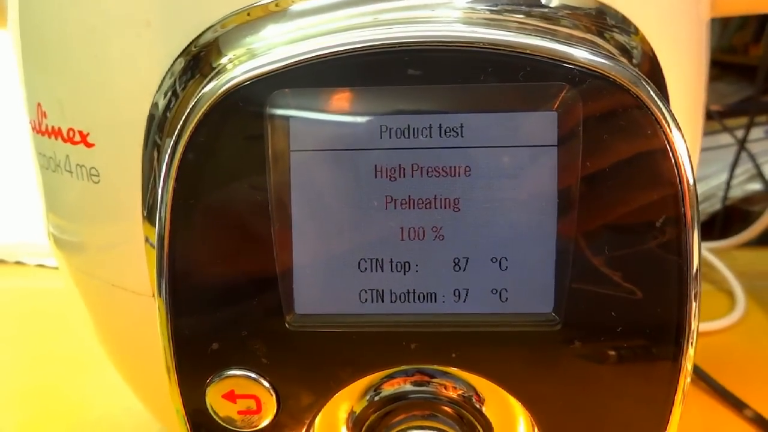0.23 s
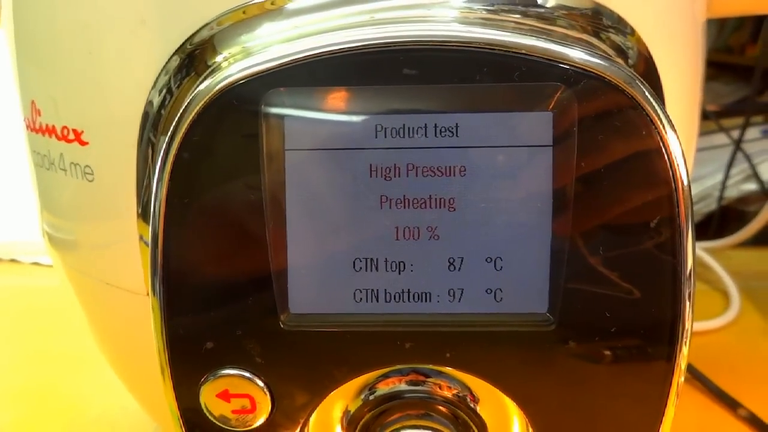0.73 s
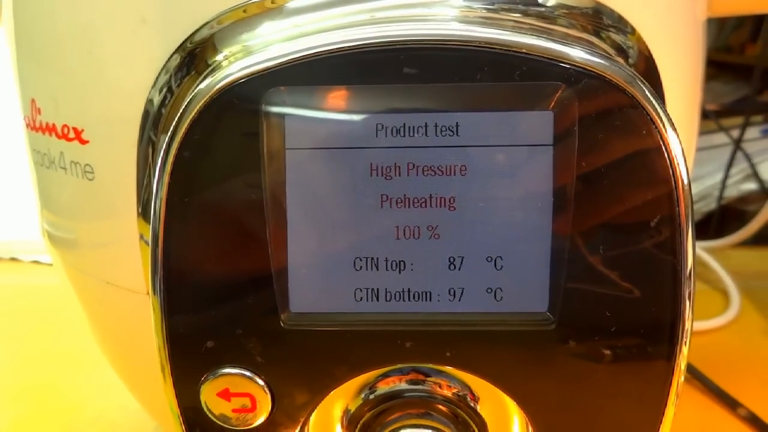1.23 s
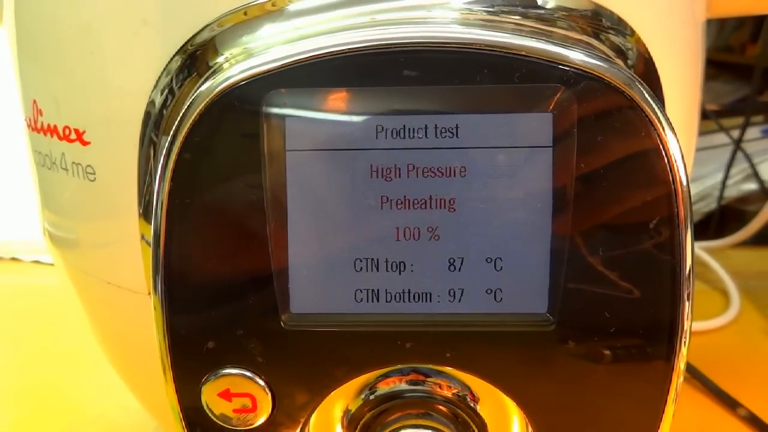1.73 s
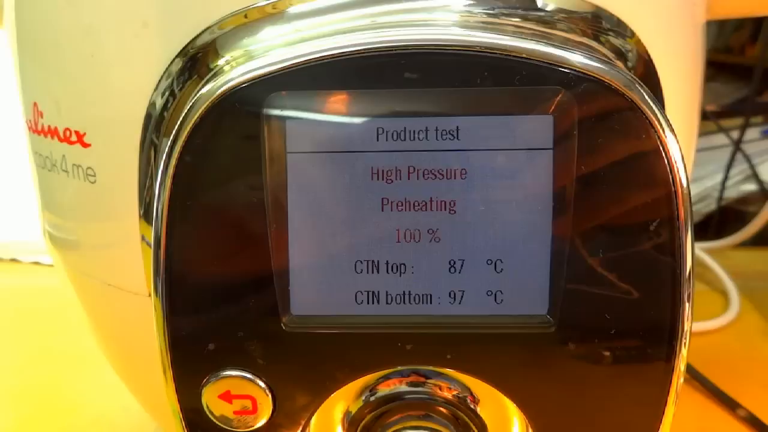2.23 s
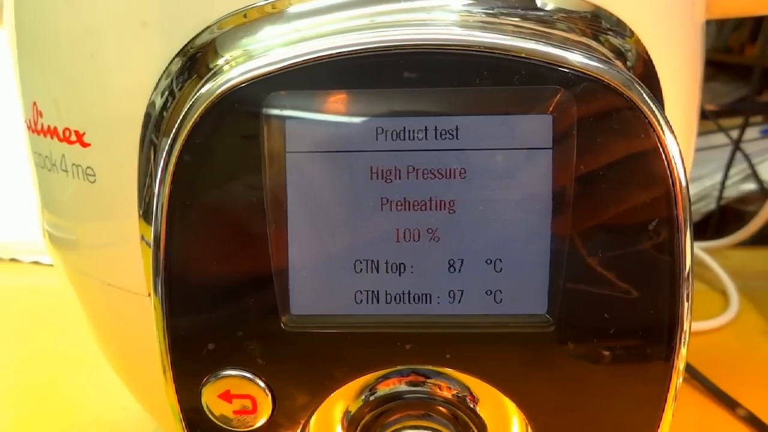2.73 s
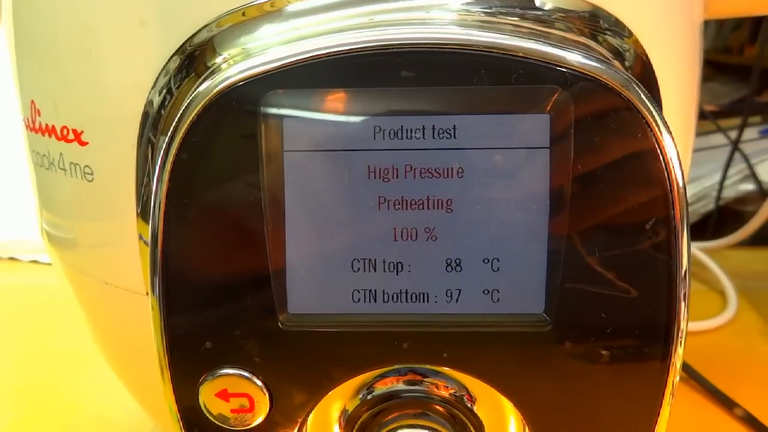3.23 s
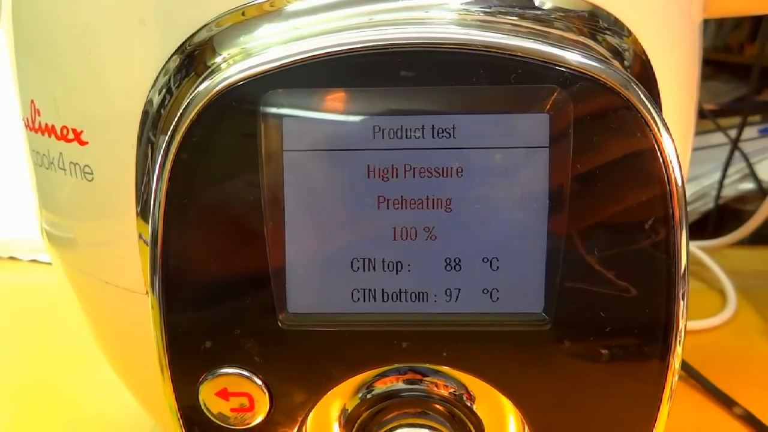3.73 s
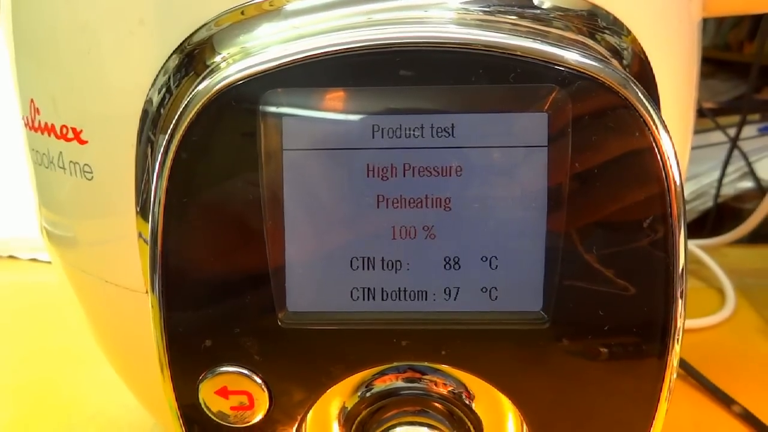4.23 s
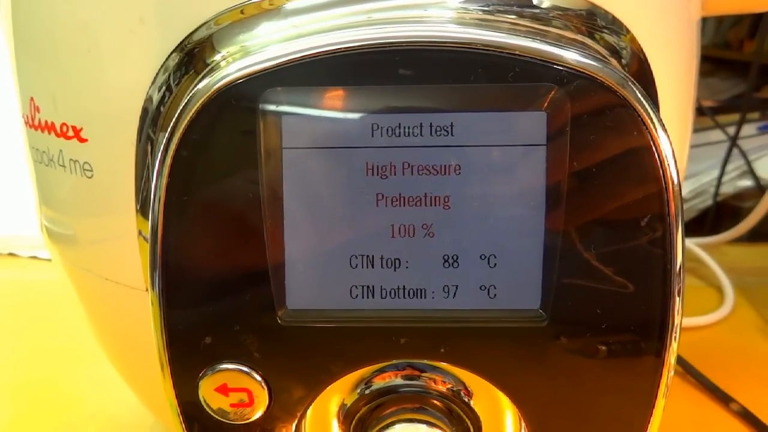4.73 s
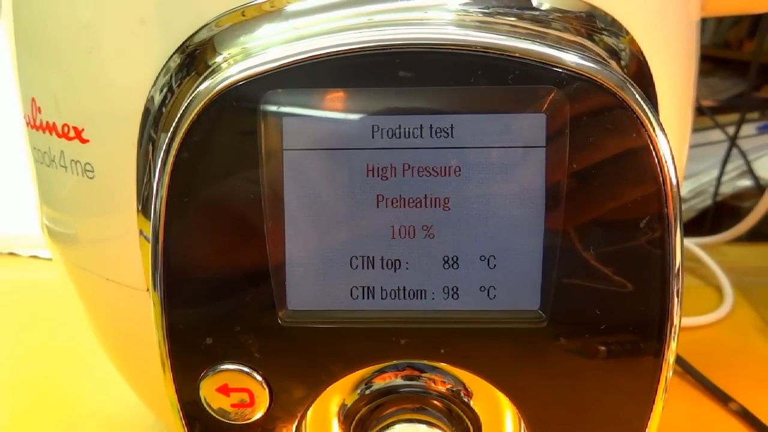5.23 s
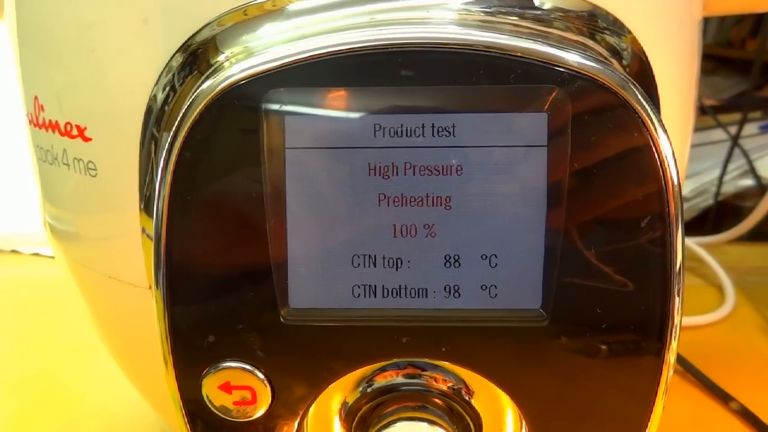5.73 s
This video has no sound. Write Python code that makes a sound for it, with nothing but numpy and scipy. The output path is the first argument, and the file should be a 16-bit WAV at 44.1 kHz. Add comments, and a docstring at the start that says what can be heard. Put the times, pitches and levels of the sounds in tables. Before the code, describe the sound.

A close, steady wet rush of steam with a hollow, ringing colour wavers gently and grows stronger over six seconds indoors.

```python
"""Steam from an electric pressure cooker

An electric pressure cooker comes up to pressure in a room, close to the microphones.
Wet turbulence sputters through the valve and rings the lid cavities; a jet at the gap hisses above it.
Condensate drops give short puffs, and once a faint pitch swells and fades as it rises.
Early echoes comb the treble, filtered noise rumbles as boiling water, and a decaying noise tail is the room.
"""
import sys
import numpy as np
from scipy import signal
from scipy.fft import rfft, irfft
from scipy.io import wavfile

SR = 44100
rng = np.random.default_rng(int(sys.argv[2]) if len(sys.argv) > 2 else 0)


def store_wav(level_fs):
    """Save 16-bit WAV to argv[1]."""
    pcm = np.round(np.clip(np.atleast_2d(level_fs), -1, 1) * 32767)
    wavfile.write(sys.argv[1], SR, pcm.T.astype(np.int16))


N = 264466
TIME = np.arange(N) / SR  # s
FREQ = np.maximum(np.arange(N // 2 + 1) * SR / N, 1)  # Hz, kept above 0 for the logarithms
OPPOSED = np.array([[1], [-1]])  # signs of a side signal at the left and right microphones


def undb(db):
    """Amplitude ratio: 20 dB is a factor of ten."""
    return 10 ** (np.asarray(db) / 20)


def unit(x):
    """Normalization to an rms of 1."""
    return x / np.sqrt(np.mean(x ** 2))


def shape(x, response):
    """Linear filtering: the spectrum is multiplied by a frequency response."""
    return irfft(rfft(x) * response, N)


def along(points):
    """Interpolation of (frequency [Hz], value) points on a logarithmic frequency axis."""
    hz, value = np.transpose(points)
    return np.interp(np.log(FREQ), np.log(hz), value)


def colour(points):
    """Spectral envelope: gain through (frequency [Hz], level [dB]) points."""
    return undb(along(points))


def below(hz):
    """Power-complementary crossover: the share of the power under a steep edge."""
    return 1 / (1 + (FREQ / hz) ** 20)


def causal(gain):
    """Minimum phase: folding the cepstrum makes a resonance ring only after it is struck."""
    cepstrum = irfft(np.log(gain + 1e-9), N)
    fold = 1 + np.sign(N / 2 - np.arange(N)) * (TIME > 0)
    return np.exp(rfft(cepstrum * fold))


def walk(rate_hz):
    """Low-pass noise: a random wander of rms 1 with little motion above the given rate."""
    return unit(shape(rng.standard_normal(N), 1 / (1 + (FREQ / rate_hz) ** 4)))


def lid():
    """Modal superposition: the powers of steep-sided cavity resonances add to a broad colour."""
    # resonances of the lid cavities: (frequency [Hz], full width at -6 dB [Hz], relative level [dB])
    lid_modes = [(593.6, 35, -17.5), (659.7, 89, -13), (801, 91, -11.5), (855, 78, -9.5), (968, 55, -8.5),
                 (1045, 140, -15.5), (1237, 67, -8.5), (1392.5, 60, -3.5), (1447, 100, -8), (1559, 84, 0.5),
                 (1646, 80, -2), (1813, 115, -5), (2001, 67, -8), (2118, 92, -8), (2177, 46, -7.5),
                 (2349, 89, -10.5), (2413, 120, -15.5), (2525, 78, -15), (2618, 47, -12.5), (2770, 76, -17),
                 (2900, 84, -18.5), (3098, 104, -16), (3470, 116, -18), (3667, 135, -19.5), (3953, 85, -21),
                 (4370, 60, -26)]
    # resonances of the small valve housing: (frequency [Hz], full width at -6 dB [Hz], relative level [dB])
    valve_modes = [(5770, 180, -22), (6280, 59, -13), (6480, 50, -16.5), (6675, 120, -14.5),
                   (7080, 130, -22), (7490, 75, -11), (7692, 99, -10.5), (9190, 71, -22.5)]
    # broad colour of the steam between the resonances: (frequency [Hz], relative level [dB])
    steam_colour = [(150, -50), (490, -26.5), (540, -39), (1100, -27), (2300, -30), (3300, -24),
                    (4300, -21.5), (4700, -35), (5750, -26), (7100, -22), (8500, -23.5), (9300, -31.5),
                    (9650, -39.5), (11000, -42)]
    power = colour(steam_colour) ** 2
    for hz, width, db in [*lid_modes, *valve_modes]:
        detuning = 2 * (FREQ - hz) / width
        power = power + undb(db) ** 2 / (1 + detuning ** 2) ** 2
    return causal(np.sqrt(power))


def sputter(rate_hz=170, spread_db=2.0, length_s=0.0022):
    """Shot process: water films break at random, each a burst of decaying power; the mean is 1."""
    chance = rng.random(N)
    size = np.minimum(rng.exponential(size=N), 4)
    bursts = (chance < rate_hz / SR) * undb(spread_db * size) ** 2
    power = signal.lfilter([1], [1, -np.exp(-1 / (length_s * SR))], bursts)
    return power / power.mean()


def wet_flow(response, level_db, wet, flutter_db, flutter_hz):
    """Source and filter: turbulence, sputtering in its wet share of power, rings the lid."""
    envelope = np.sqrt(1 - wet + wet * sputter())
    flutter = undb(flutter_db * walk(flutter_hz))
    drive = rng.standard_normal(N) * envelope * flutter
    return unit(shape(drive, response)) * undb(level_db)


def jet(response, level_db, flutter_db=0.8, flutter_hz=35):
    """Jet noise: steady turbulence at the valve gap makes a smoother hiss."""
    drive = rng.standard_normal(N) * undb(flutter_db * walk(flutter_hz))
    return unit(shape(drive, response)) * undb(level_db)


def spits(response, gain_db=-6, decay_s=0.0069):
    """Transient excitation: each larger drop gives a decaying puff of noise to the same resonances."""
    # drops of condensate spat through the valve: (time [s], relative peak level [dB])
    drops = [(0.34, -23), (1.334, -40), (2.31, -27), (3.067, -25), (3.525, -28.5), (3.604, -29),
             (4.664, -25), (4.722, -24), (5.06, -25.5), (5.335, -25.5), (5.781, -25)]
    puffs = np.zeros(N)
    for start, db in drops:
        puffs += undb(db) * (TIME >= start) * np.exp(-np.abs(TIME - start) / decay_s)
    return undb(gain_db) * shape(rng.standard_normal(N) * puffs, unit(np.abs(response)))


def whistle(peak_s=5.28, swell_s=0.05, hz=890, rise_hz_per_s=150, level_db=-47, waver_hz=6):
    """Frequency modulation: the steam briefly catches a faint, wavering pitch that rises."""
    since = TIME - peak_s
    pitch = hz + rise_hz_per_s * since + waver_hz * walk(34)
    tone = unit(np.sin(2 * np.pi * np.cumsum(pitch) / SR))
    return tone * undb(level_db) * np.exp(-(since / swell_s) ** 2 / 2)


def surfaces(x, echo_db=-8, decay_s=0.012, above_hz=3300, count=60):
    """Comb filtering: small hard surfaces nearby throw back the short waves."""
    lag = rng.uniform(.002, .04, count)  # s
    size = rng.standard_normal(count)
    echoes = np.bincount((lag * SR).astype(int), size * np.exp(-lag / decay_s), N)
    share = undb(echo_db) * np.sqrt(1 - below(above_hz))
    reflected = rfft(echoes) / np.linalg.norm(echoes)
    return shape(x, (1 + share * reflected) / np.sqrt(1 + share ** 2))


def microphones(x, pan_db=-0.17):
    """Interaural phase and level: the direct sound leads, and is slightly louder, on the left."""
    # phase by which the left microphone leads: (frequency [Hz], phase [rad])
    left_lead = [(100, 0), (350, 1), (600, 0.7), (1500, 0.19), (4000, 0.36), (9000, 0.053)]
    halves = OPPOSED / 2
    return shape(x, np.exp(1j * halves * along(left_lead)) * undb(-pan_db * halves))


def room(x, t60_s=0.31, mid_db=-2, side_db=0):
    """Diffuse reverberation: decaying noise tails, one shared by the microphones and one opposed."""
    # spectrum of the room sound, before the mid and side gains: (frequency [Hz], relative level [dB])
    room_share = [(300, -5), (500, -10.5), (700, -12), (1500, -14.5), (3000, -13.5), (4200, -20.5),
                  (4800, -4.5), (6200, -15.5), (9000, -12)]
    tails = rng.standard_normal((2, N)) * undb(-60 * TIME / t60_s)
    response = rfft(tails) / np.linalg.norm(tails, axis=1, keepdims=True)
    mid, side = shape(x, colour(room_share) * response)
    return undb(mid_db) * mid + undb(side_db) * side * OPPOSED


def boil(level_db, side_db=-5, swell_db=1.5, swell_hz=6):
    """Transmission through a wall: boiling is heard as muffled, wide noise that slowly swells."""
    # water boiling behind the pot wall: (frequency [Hz], relative level [dB])
    boil_colour = [(60, -30), (130, -10), (175, 2), (240, -1.5), (330, -4), (480, 0), (800, -20),
                   (3000, -60)]
    mid, side = shape(rng.standard_normal((2, N)), colour(boil_colour))
    rumble = unit(mid + undb(side_db) * side * OPPOSED)
    return rumble * undb(level_db + swell_db * walk(swell_hz))


def room_air(air_db=-76.5, hum_hz=50, hum_db=-100, apart_hz=260):
    """Spatial coherence: background air is alike on both sides in the bass; a trace of mains hum is added."""
    # still air of the room: (frequency [Hz], relative level [dB])
    air_colour = [(20, -17), (50, -9), (90, -4), (130, 2.5), (175, -1), (400, 1), (600, -2), (2000, -16),
                  (10000, -27)]
    mid, side = shape(rng.standard_normal((2, N)), colour(air_colour))
    side = shape(side, FREQ / np.hypot(FREQ, apart_hz))
    hum = unit(np.sin(2 * np.pi * hum_hz * TIME))
    return undb(air_db) * unit(mid + side * OPPOSED) + undb(hum_db) * hum


def scene(burble_top_hz=1300, flow_top_hz=4900):
    """Common excitation: one steam flow drives burble, rush, jet and boiling, the steam split into bands."""
    # steam flow, which sags and surges as the pot heats: (time [s], level about the usual flow [dB])
    steam_flow = [(0.0, -0.5), (0.44, -1.4), (0.92, -6), (1.72, -2.0), (2.0, -2.0), (2.1, 0.5),
                  (2.52, 0.15), (3.02, 4.0), (4.24, -0.95), (4.32, 1), (4.38, 1.2), (4.9, 2.5), (5.1, -0.8),
                  (5.34, 4), (5.54, 3.5), (5.76, 5.5), (5.86, 2.1), (6.0, 3.0)]
    flow_db = np.interp(TIME, *np.transpose(steam_flow))
    path, low, middle = lid(), below(burble_top_hz), below(flow_top_hz)
    # each level is a base [dB] plus a growth [dB per dB of flow];
    # the jet grows fastest, so a surge is brighter as well as louder
    burble = wet_flow(path * np.sqrt(low), -46.0 + 0.47 * flow_db,
                      wet=0.26, flutter_db=0.86, flutter_hz=16)
    rush = wet_flow(path * np.sqrt(np.abs(middle - low)), -38.5 + 0.63 * flow_db,
                    wet=0.26, flutter_db=0.31, flutter_hz=45)
    hiss = jet(path * np.sqrt(1 - middle), -47.3 + 1.06 * flow_db)
    steam = burble + rush + hiss + spits(path * middle) + whistle()
    direct = microphones(surfaces(steam))
    return direct + room(steam) + boil(-72.3 + 0.5 * flow_db) + room_air()


def record(dry, top_hz=11000):
    """Band limiting: an elliptic low-pass (0.2 dB ripple, 80 dB stopband) cuts the top steeply."""
    return signal.sosfilt(signal.ellip(12, .2, 80, top_hz, fs=SR, output="sos"), dry)


dry = scene()
out = record(dry)
store_wav(out)
```